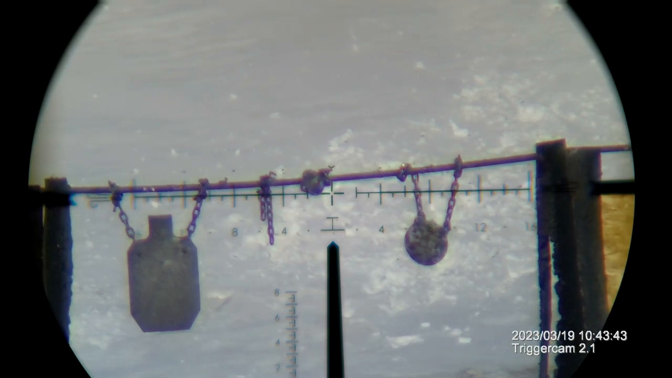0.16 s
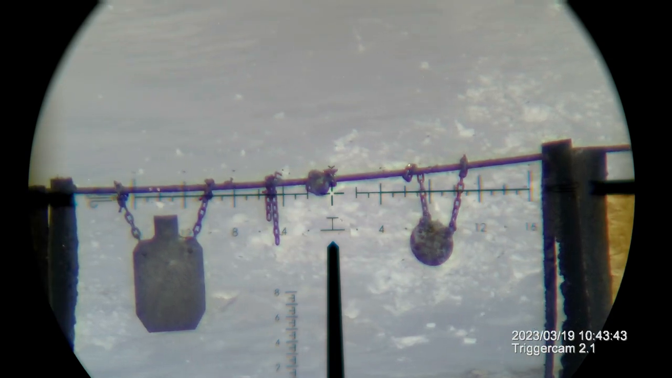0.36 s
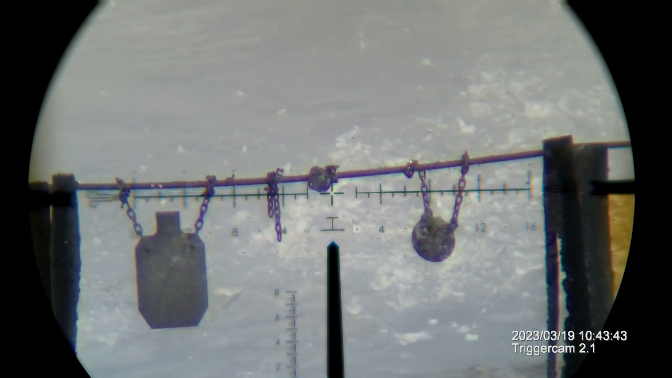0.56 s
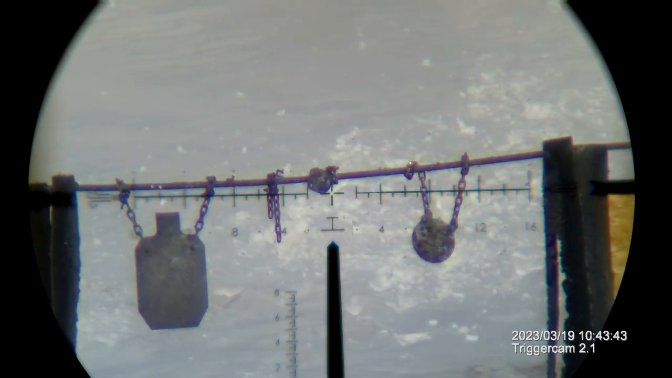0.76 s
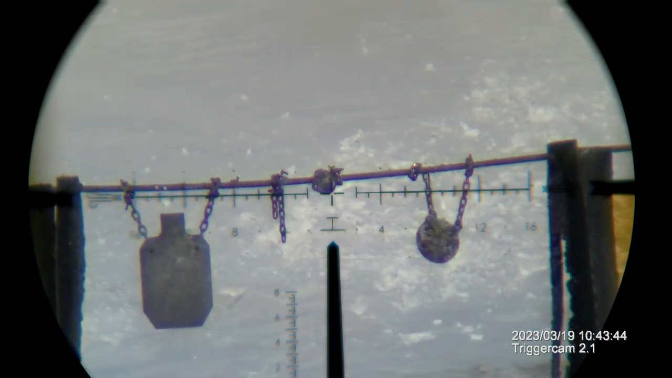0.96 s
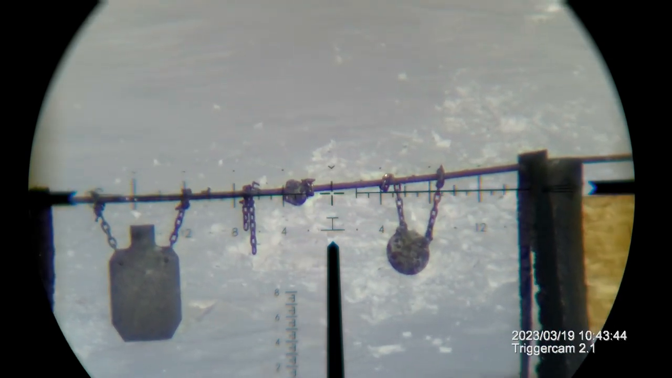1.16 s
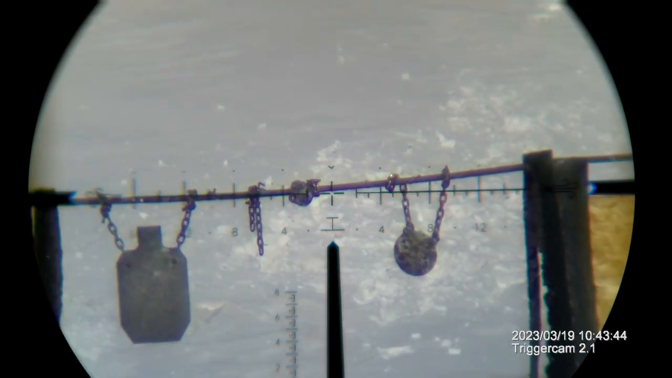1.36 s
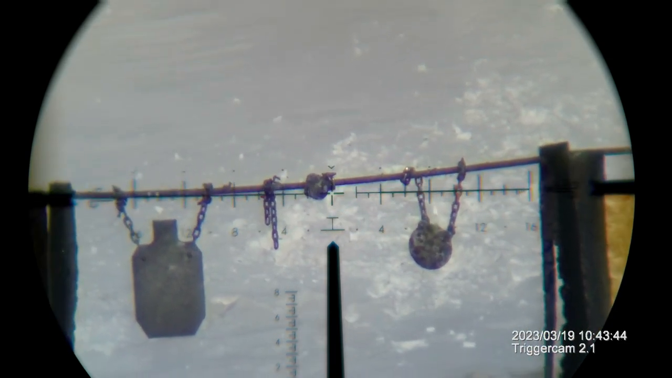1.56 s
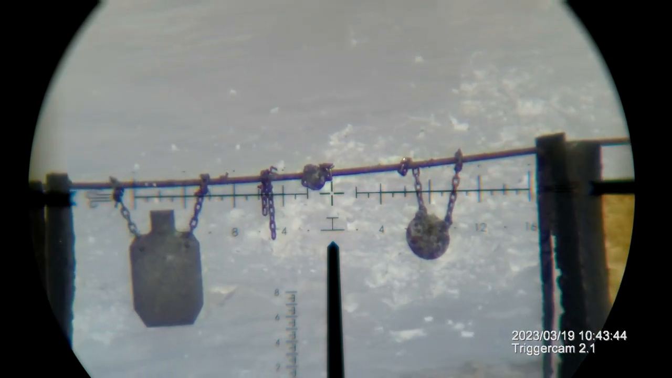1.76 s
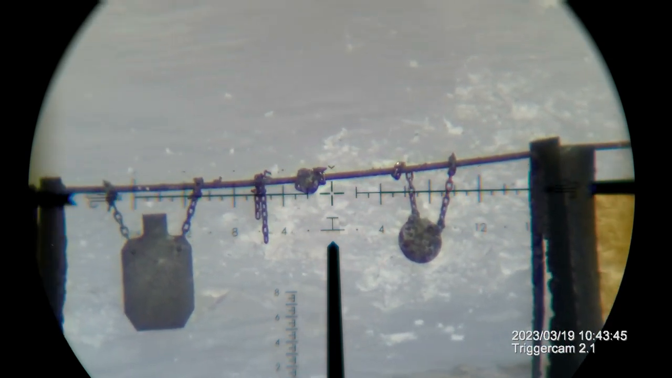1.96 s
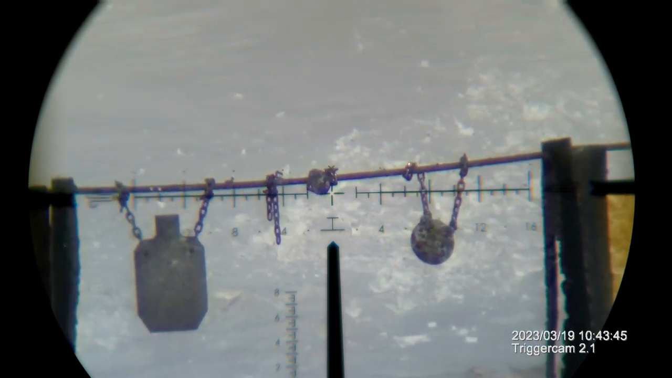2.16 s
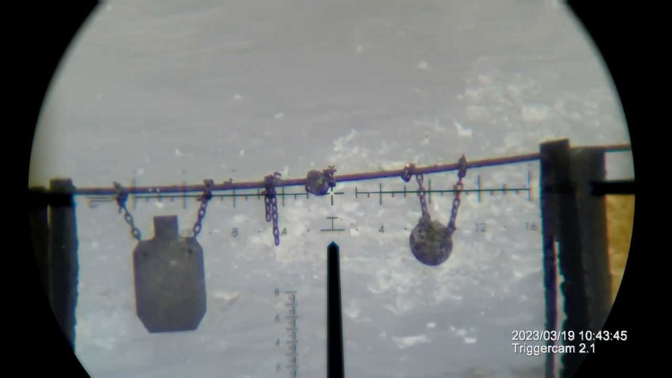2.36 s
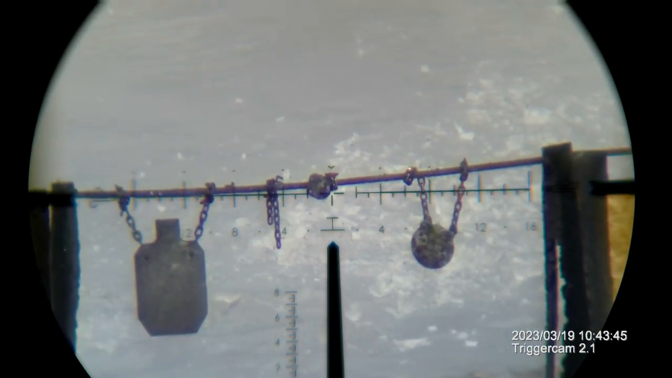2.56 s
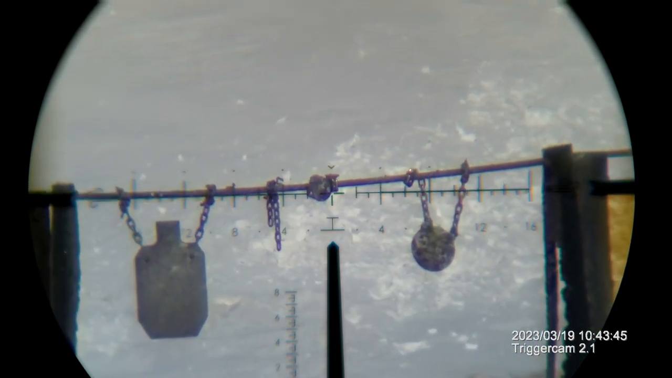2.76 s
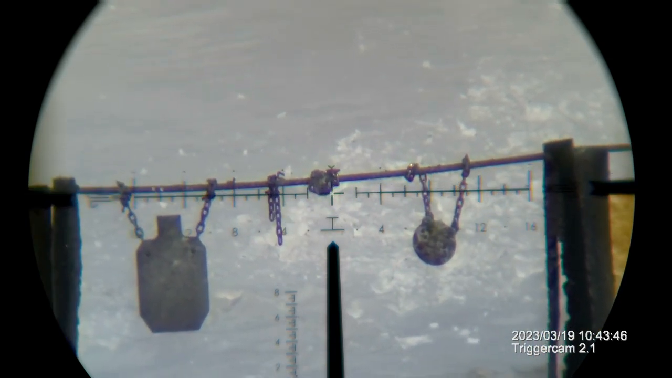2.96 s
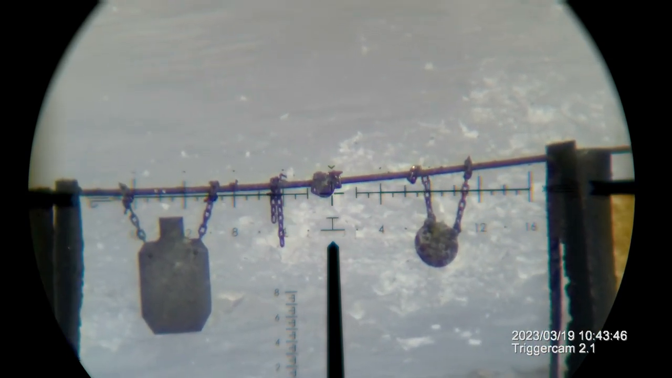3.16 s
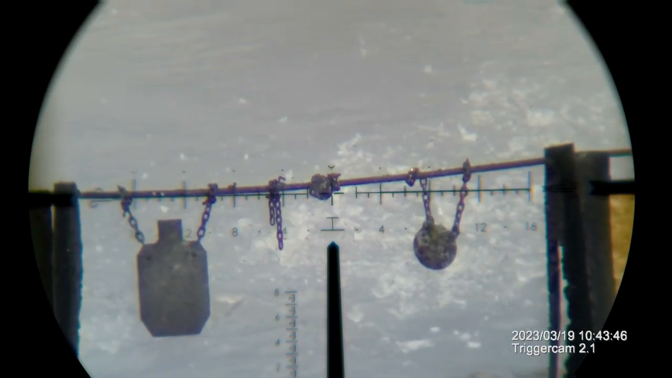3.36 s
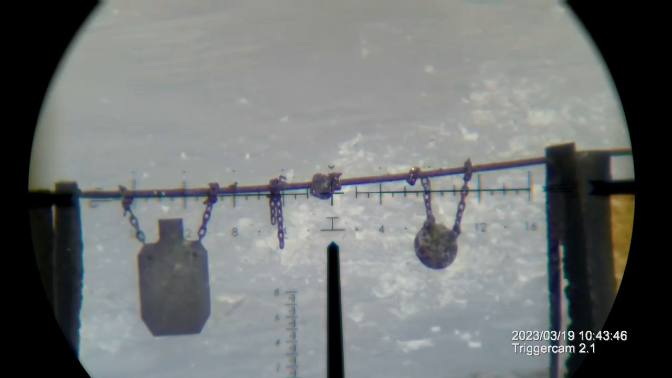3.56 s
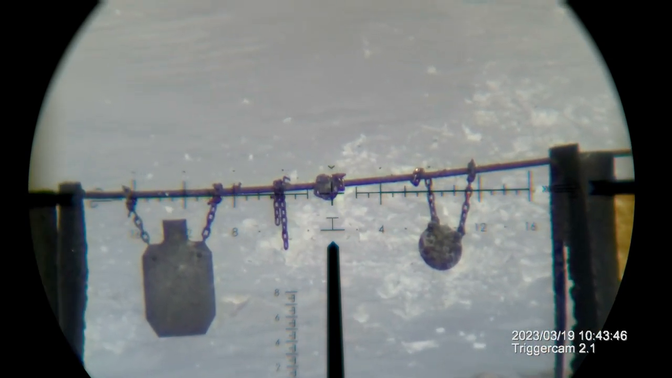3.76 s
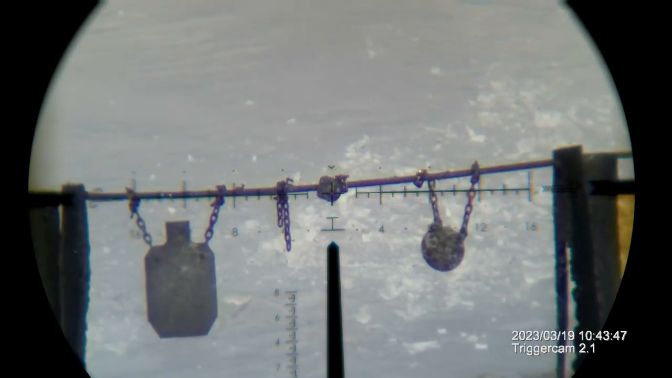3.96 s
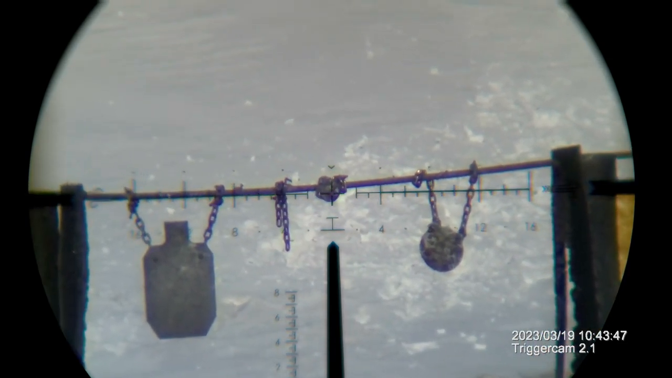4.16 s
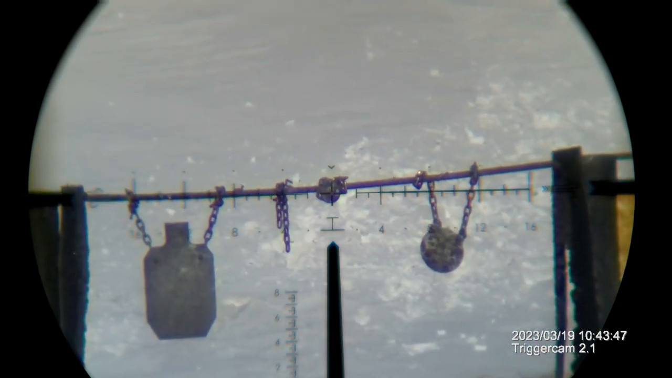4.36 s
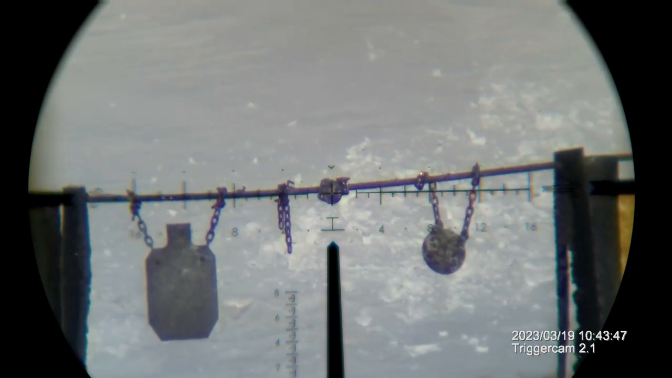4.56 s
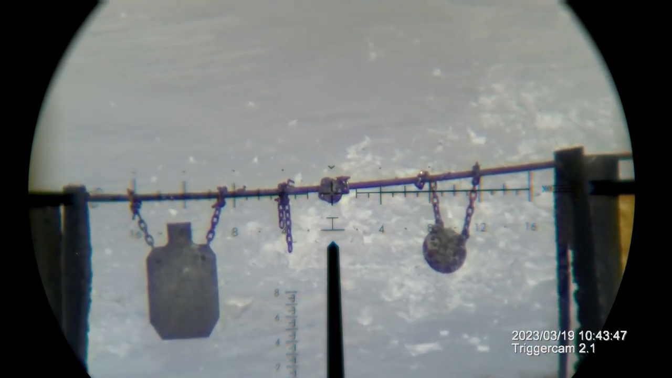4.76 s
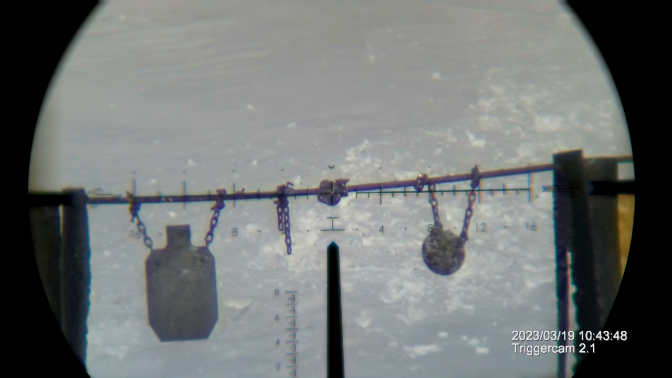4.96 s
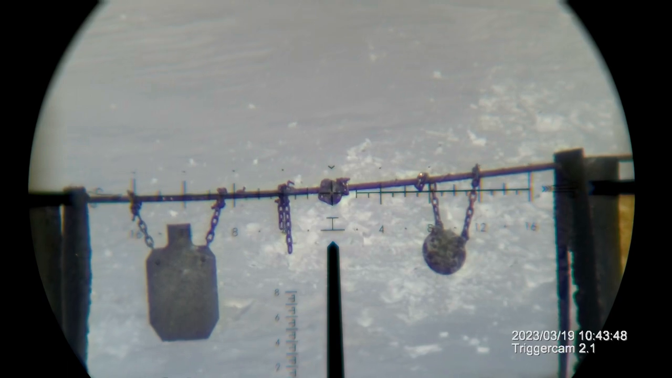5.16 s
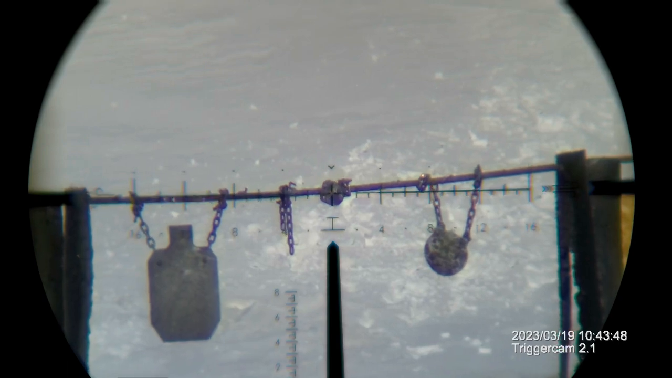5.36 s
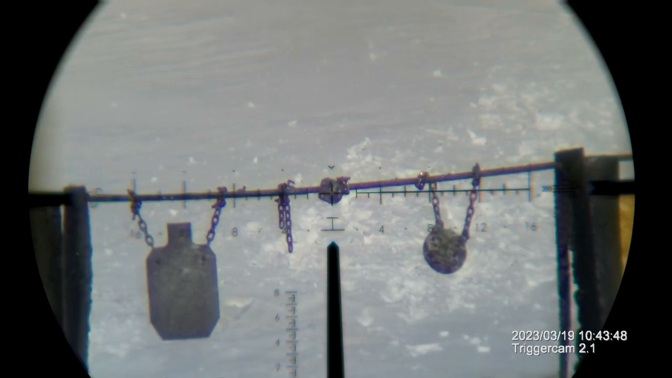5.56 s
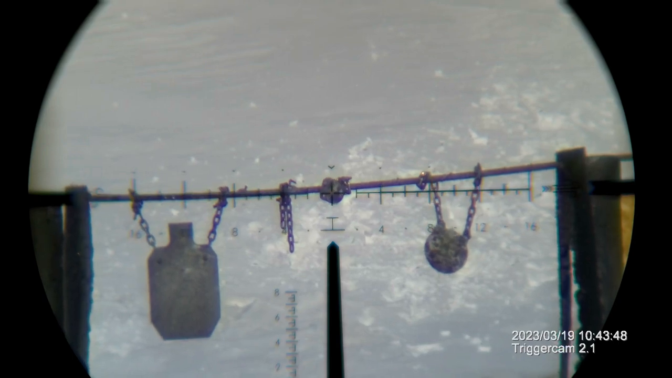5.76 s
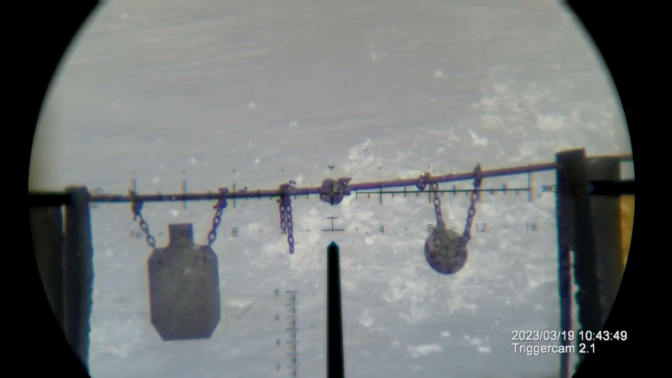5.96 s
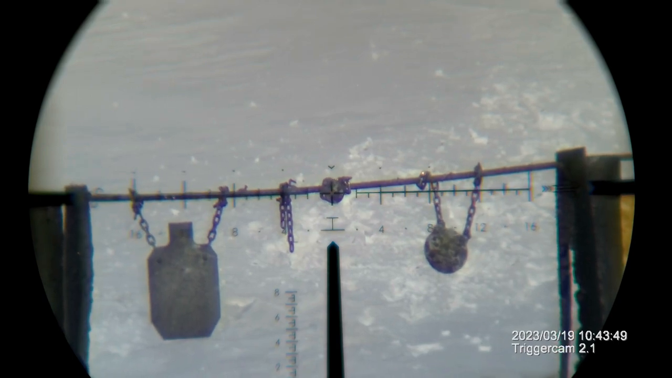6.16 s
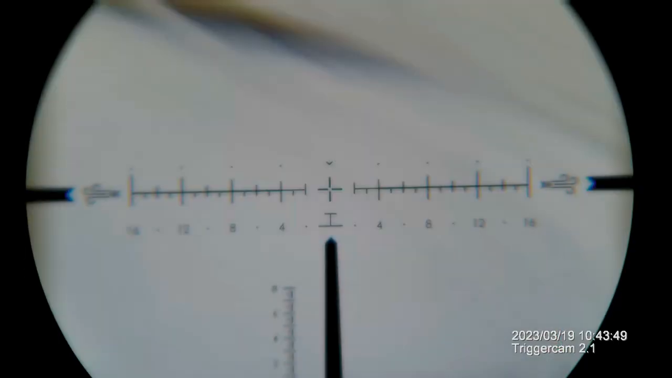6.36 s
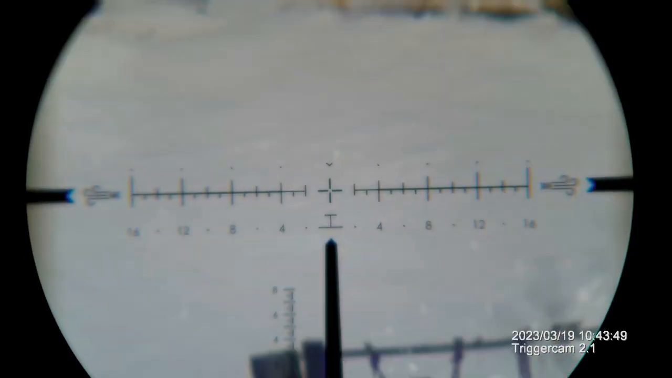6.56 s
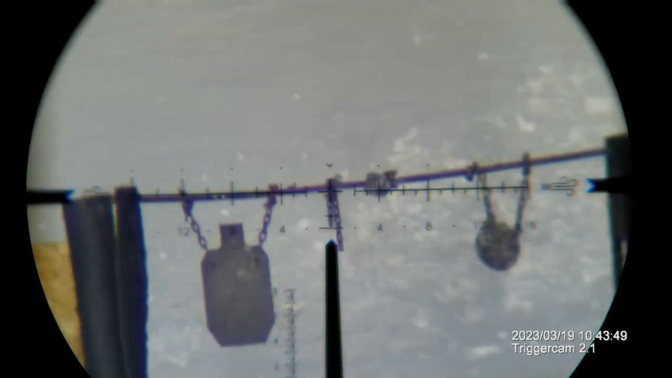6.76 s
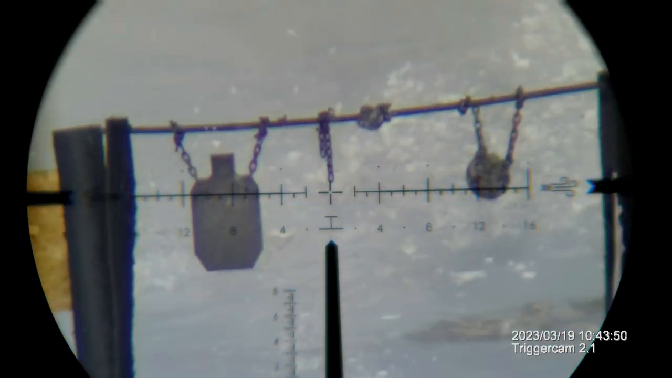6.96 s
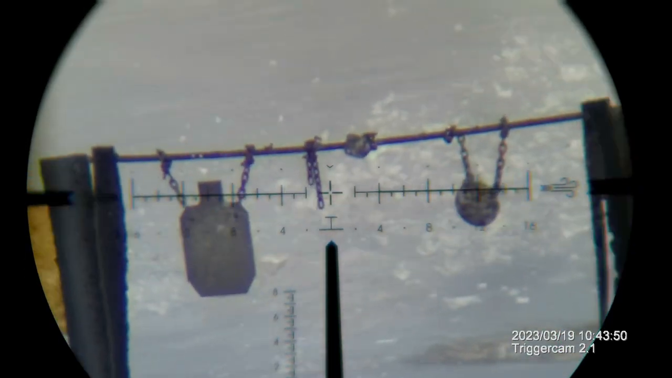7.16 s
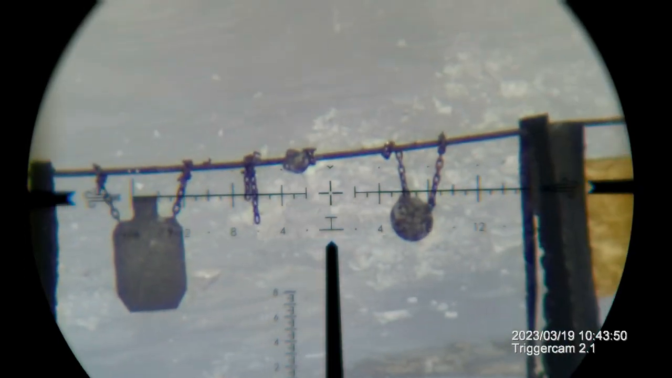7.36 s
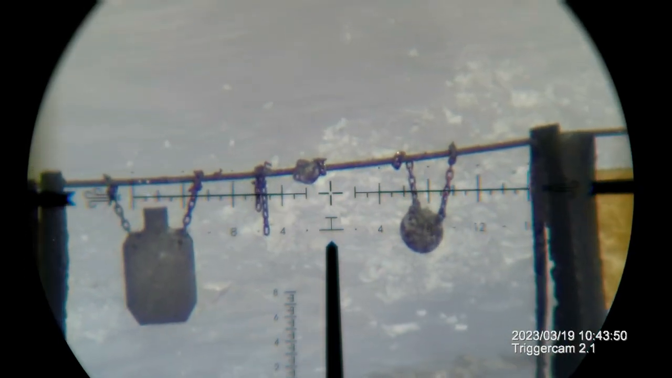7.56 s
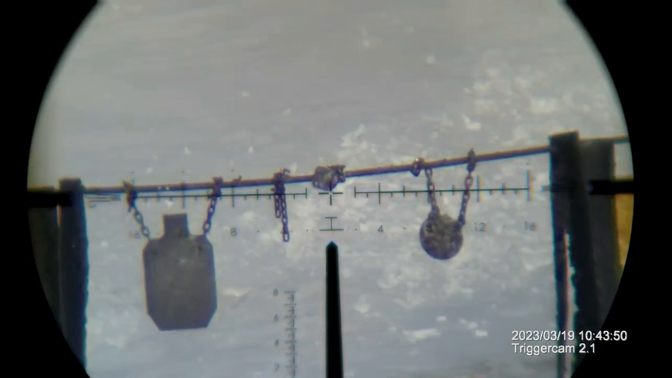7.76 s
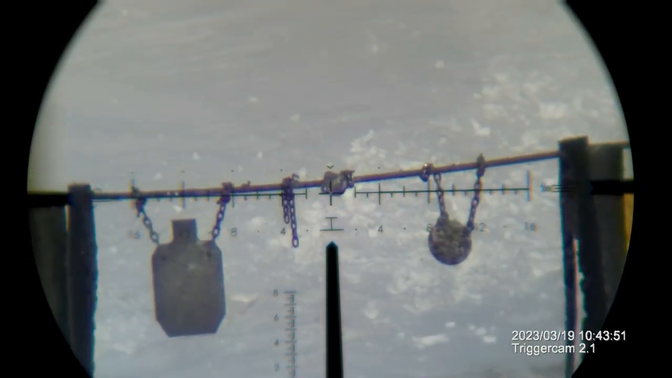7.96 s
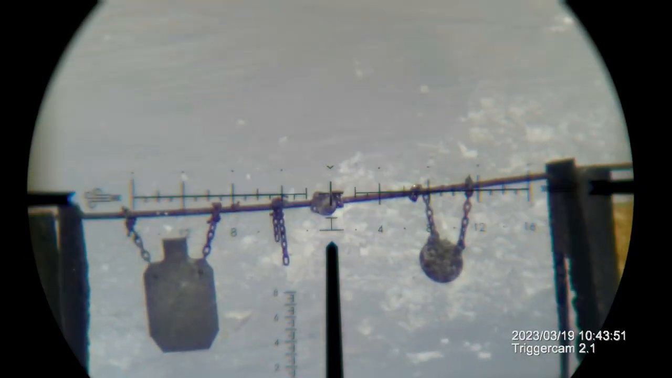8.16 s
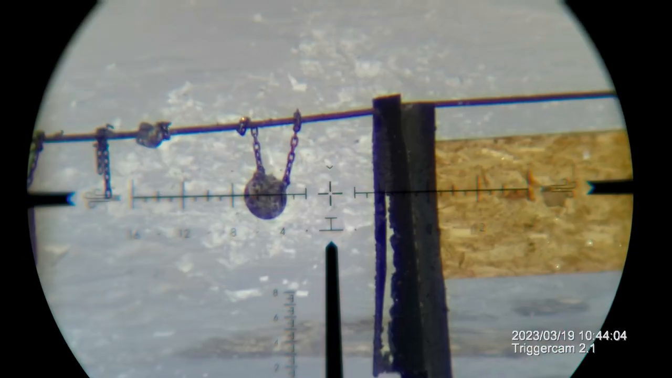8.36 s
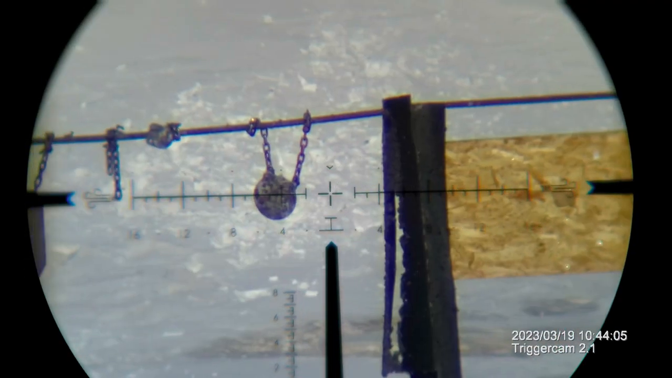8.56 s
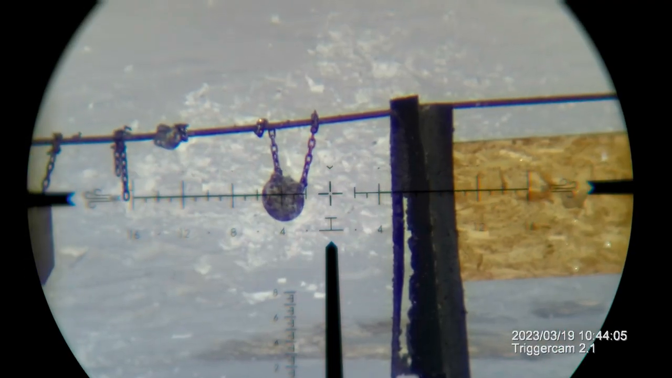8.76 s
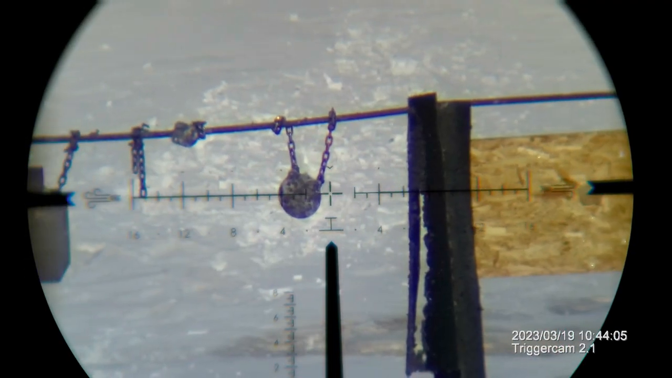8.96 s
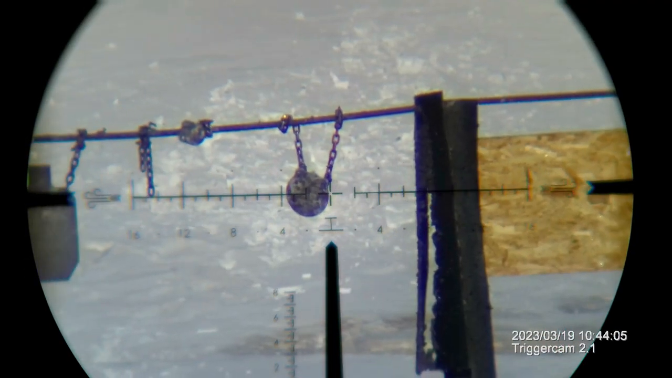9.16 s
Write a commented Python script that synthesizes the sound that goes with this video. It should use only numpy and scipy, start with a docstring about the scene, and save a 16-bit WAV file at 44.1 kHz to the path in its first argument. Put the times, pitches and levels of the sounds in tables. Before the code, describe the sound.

At an outdoor range, soft handling and a nearby gunshot precede a huge distorted rifle shot, sharp cracking echoes and long-ringing steel.

```python
"""A rifle fires on a range and overloads the small camera microphone on its scope, leaving steel ringing.
The blast is layered noise bursts; the steel and the sharp reports from downrange are decaying sines.
Before it the rifle clicks and rubs in the hands and a neighbour's blast wave arrives, with rolling echoes.
A low rumble, hiss and the camera's whine lie underneath; near the end all dips to silence and the ring stops."""
import sys
import numpy as np
from scipy import signal
from scipy.fft import rfft, irfft
from scipy.io import wavfile

SR = 44100
rng = np.random.default_rng(int(sys.argv[2]) if len(sys.argv) > 2 else 0)


def generate_wav(signal):
    """Clip the signal to [-1, 1] and save it as 16-bit WAV at the path in sys.argv[1]."""
    frames = np.transpose(np.atleast_2d(signal))
    scaled = np.clip(frames, -1, 1) * 32767
    pcm = np.round(scaled).astype(np.int16)
    wavfile.write(sys.argv[1], SR, pcm)


N = 406602
T = np.arange(N) / SR
FREQS = np.arange(N // 2 + 1) * SR / N
DIP_S = 8.266  # the steel stops here, at the bottom of a brief dip to silence


def amp(db):
    """Decibels to gain."""
    return 10 ** (np.asarray(db) / 20)


def unit(x):
    """Scales to an rms of 1."""
    return x / np.sqrt(np.mean(x ** 2) + 1e-20)


def add(mix, s, sound):
    """Mixes a sound in at a time in seconds, cut off at the end of the mix."""
    part = mix[round(s * SR):][:len(sound)]
    part += sound[:len(part)]


def noise(spectrum):
    """Steady noise of rms 1, coloured by a table of pitch_hz and level_db."""
    hz, db = np.transpose(spectrum)
    gain = amp(np.interp(np.log(FREQS + 1), np.log(hz), db))
    return unit(irfft(rfft(rng.standard_normal(N)) * gain, N))


def band(hz, centre_hz, octaves):
    """Gain of a broad hump with gentle skirts."""
    return (1 + (np.log2((hz + 1) / centre_hz) / octaves) ** 2 / 4) ** -3


def fade(t, t60):
    """Exponential decay, 60 dB down after t60 seconds."""
    return np.exp(-np.log(1000) * t / t60)


def burst(centre_hz, octaves, rise, t60):
    """A second of band noise that swells and dies away."""
    t = T[:SR]
    gain = band(np.arange(SR // 2 + 1), centre_hz, octaves)
    hiss = unit(irfft(rfft(rng.standard_normal(SR)) * gain, SR))
    return hiss * (1 - np.exp(-t / rise)) * fade(t, t60)


def ring(modes, t):
    """Struck modes, each a sine dying at its own speed."""
    return sum(amp(db) * np.sin(2 * np.pi * hz * t) * fade(t, t60) for hz, db, t60 in modes)


def smooth(x, hz, kind="low", order=2):
    """A causal low-pass or high-pass."""
    return signal.sosfilt(signal.butter(order, min(hz, .45 * SR), kind, fs=SR, output="sos"), x)


def swell(peak_s, db, rise, t60):
    """An envelope that grows smoothly to a peak and then dies away."""
    grown = np.clip(1 + (T - peak_s) / rise, 0, 1)
    return amp(db) * np.sin(np.pi / 2 * grown) ** 2 * fade(np.maximum(T - peak_s, 0), t60)


# colour of the rumble: pitch_hz, level_db (per Hz)
RUMBLE_COLOUR = [(15, -5), (28, -5), (42, -0.5), (55, -5), (72, -12), (95, -4.5), (115, -15.5), (170, -15),
                 (250, -23), (400, -34.5), (800, -61)]
# colour of the microphone hiss: pitch_hz, level_db (per Hz)
HISS_COLOUR = [(100, 0), (500, 2.5), (1000, -3), (2300, -4.5), (3500, -8.5), (6500, -10), (10000, -11),
               (12500, -8.5), (15000, -13.5)]
# strength of rumble and hum together: time_s, level_db
RUMBLE_STRENGTH = [(0, -39.5), (1.7, -36), (2.6, -38.5), (3.7, -36), (4.4, -40), (8.1, -41), (8.5, -44.5),
                   (9.22, -45)]
# the hum climbs and settles
HUM_START_HZ, HUM_HZ, HUM_SETTLE_S = 44.7, 51.7, 1.0


def background():
    """Low rumble around a hum that wavers in pitch and level, and even microphone hiss."""
    climb = HUM_HZ + (HUM_START_HZ - HUM_HZ) * np.exp(-T / HUM_SETTLE_S)
    hz = climb * (1 + 0.024 * noise([(1, 0), (5, 1), (15, -60.0)]))
    phase = 2 * np.pi * np.cumsum(hz) / SR
    waver = amp(1.5 * noise([(1, -2.0), (6, -5), (18, -61.5)]))
    hum = (np.sin(phase) + amp(-15.5) * np.sin(2 * phase)) * waver
    low = amp(-6.0) * noise(RUMBLE_COLOUR) + hum
    strength = amp(np.interp(T, *np.transpose(RUMBLE_STRENGTH)))
    return low * strength + amp(-61.0) * noise(HISS_COLOUR)


# whine of the camera's electronics, close to the microphone: pitch_hz, width_hz, level_db
WHINE_BANDS = [(7600, 620, -5), (8740, 370, -9), (9770, 370, 0.5), (10740, 241.2, -1.5)]


def camera_whine():
    """The electronics chirp for each picture and each sound block, on the ticks of a 10 ms clock."""
    jobs = np.concatenate([np.arange(0, T[-1], 1 / rate) for rate in (30, 23.44)])  # per second
    ticks = np.unique(np.ceil(jobs * 100 - .01) / 100)
    busy = np.zeros(N)
    for s in ticks:
        add(busy, s + 0.0072, signal.windows.tukey(round(0.006007 * SR), .4))
    colour = sum(amp(db) * np.exp(-2 * ((FREQS - hz) / width) ** 2 / np.e) for hz, width, db in WHINE_BANDS)
    return amp(-59.5) * busy * unit(irfft(rfft(rng.standard_normal(N)) * colour, N))


# modes of the stock, for rubbing and clicks: pitch_hz, level_db, t60_s (shorter under rubbing hands)
STOCK_MODES = [(313, -12, 0.092), (493, -5.5, 0.14), (570, -22.5, 0.1), (884.5, -16.5, 0.11),
               (1090, -20.5, 0.037), (1090, -13.5, 0.014), (1430, -15, 0.038), (1526, -16, 0.081)]
# soft rubbing strokes on the stock: middle_s, level_db, half_length_s
RUB_STROKES = [(1.435, -60, 0.21), (1.71, -61, 0.063), (1.94, -66.5, 0.11)]


def rubbing():
    """Dense tiny slips ring the modes of the stock, swelling and fading with each stroke."""
    slips = rng.standard_normal(N) ** 3 * (rng.random(N) < 2600 / SR)  # about 2600 a second
    body = ring([(hz, db, 0.46 * t60) for hz, db, t60 in STOCK_MODES], T[:SR // 8])
    pressure = sum(amp(db) * np.exp(-((T - s) / half) ** 2) for s, db, half in RUB_STROKES)
    ringing = unit(smooth(signal.oaconvolve(slips, body)[:N], 540, "high"))
    return pressure * (ringing + amp(-13) * unit(smooth(slips, 3200)))


# handling clicks on the rifle: start_s, level_db, pitch_hz, t60_s, tick_db (metal tick relative to the click)
HANDLING_CLICKS = [(0.8697, -29, 1150, 0.036, -31), (0.9034, -27, 1260, 0.031, -11),
                   (.9135, -38.5, 1182, 0.027, -4.5), (1.298, -55, 1130, 0.054, -16),
                   (1.421, -54, 600, .04, -22), (1.5228, -45, 1030, 0.02, -18),
                   (1.5478, -51.5, 830, 0.11, -22), (1.7226, -37.5, 1060, 0.042, -24),
                   (1.7256, -34.5, 510, 0.039, -28), (2.049, -57.5, 1000, .05, -20),
                   (7.181, -43, 228, 0.16, -35), (7.345, -43, 1370, .04, -8),
                   (8.176, -35, 1380, 0.019, -18), (8.181, -52.5, 1460, 0.21, -22)]
# shared by all clicks: scrape, metal tick, dull thud and ring of the stock
SCRAPE_OCTAVES, SCRAPE_RISE_S = 0.29, 0.00021
TICK_HZ, TICK_OCTAVES, TICK_T60_S = 3570, 0.2, 0.014
THUD_DB, THUD_HZ, THUD_OCTAVES, THUD_T60_S = -16.5, 347, 0.29, 0.14
STOCK_DB, STOCK_OCTAVES = 6, 0.76


def handling():
    """Each click scrapes, ticks and thuds, and rings the modes of the rifle that lie in its band."""
    out = np.zeros(N)
    for s, db, hz, t60, tick_db in HANDLING_CLICKS:
        modes = [(f, d + 20 * np.log10(band(f, hz, STOCK_OCTAVES)), life) for f, d, life in STOCK_MODES]
        scrape = burst(hz, SCRAPE_OCTAVES, SCRAPE_RISE_S, t60)
        tick = amp(tick_db) * burst(TICK_HZ, TICK_OCTAVES, SCRAPE_RISE_S, TICK_T60_S)
        thud = amp(THUD_DB) * burst(THUD_HZ, THUD_OCTAVES, SCRAPE_RISE_S, THUD_T60_S)
        add(out, s, amp(db) * (scrape + tick + thud + amp(STOCK_DB) * ring(modes, T[:SR])))
    return out


# neighbour's shot and its reflections: start_s, level_db (before the 3 dB gain below),
# push_s (length of the push), brightness_hz
NEIGHBOUR_WAVES = [(3.0261, -6, 0.0069, 820), (3.0272, -13.5, .003, 700), (3.0278, -5.5, 0.0033, 202),
                   (3.045, -19, 0.016, 150), (3.0506, -14, 0.011, 597)]
# the first wave cracks briefly; the last reflection scatters off the ground in a dull wash
FAR_CRACK_DB, FAR_CRACK_HZ, FAR_CRACK_T60_S = -47, 2080, 0.061
FAR_WASH_DB, FAR_WASH_HZ, FAR_WASH_T60_S, FAR_WASH_TOP_HZ = -44, 2220, 0.29, 2800


def neighbour(scatter_db=-23, scatter_hz=520, slap_db=-24, slap_hz=850,
              thud_db=-22, thud_hz=270, tail_db=-36, tail_hz=450):
    """Blast waves push, then suck for longer; the first cracks and scatters, the last slaps and washes."""
    out, t = np.zeros(N), T[:SR]
    for s, db, push, bright_hz in NEIGHBOUR_WAVES:
        add(out, s, amp(db) * smooth((1 - t / push) * np.exp(-t / push), bright_hz, order=3))
    out = amp(3.0) * smooth(out, 17.0, "high")
    first_s, first_db = NEIGHBOUR_WAVES[0][:2]
    add(out, first_s, amp(first_db + scatter_db) * burst(scatter_hz, .62, .00046, 0.093))
    add(out, first_s, amp(FAR_CRACK_DB) * burst(FAR_CRACK_HZ, .45, .0003, FAR_CRACK_T60_S))
    slap = amp(slap_db) * burst(slap_hz, 0.82, 0.00022, 0.01)
    thud = amp(thud_db) * burst(thud_hz, 0.12, 0.00088, 0.083)
    wash = amp(FAR_WASH_DB) * smooth(burst(FAR_WASH_HZ, 0.37, 0.0026, FAR_WASH_T60_S), FAR_WASH_TOP_HZ, order=6)
    tail = amp(tail_db) * burst(tail_hz, 1.0, 0.0036, .25)
    add(out, NEIGHBOUR_WAVES[-1][0], slap + thud + wash + tail)
    return out


# colours of the low and bright echoes of the range: pitch_hz, level_db (per Hz)
LOW_COLOUR = [(20, -10), (60, 8.5), (110, -2), (200, 0), (330, -5.5), (450, -16), (650, -11), (1000, -26.5),
              (2000, -70.5)]
BRIGHT_COLOUR = [(300, -3.5), (750, 4.5), (1050, -1.5), (1350, 8), (1750, -0.5), (2000, 1), (2400, 7),
                 (3000, -7.5), (4300, -7), (5500, -18), (7500, -18), (10000, -30), (15000, -49)]
# low echoes rolling over the range after both shots: peak_s, level_db, rise_s, t60_s
LOW_WAVES = [(3.065, -33, .012, 0.27), (3.33, -53.5, 0.21, 4.2), (6.335, -6, 0.09, 0.21),
             (6.545, -28.5, 0.22, 2.26)]
# bright scatter from the ground and banks: peak_s, level_db, rise_s, t60_s
BRIGHT_WAVES = [(3.281, -55, .003, 0.053), (6.33, -33, .08, 1.12), (6.665, -43, .04, 0.35)]
# a distant bank hums the neighbour's shot back
BANK_S, BANK_DB, BANK_HZ = 3.44, -51.5, 680


def range_echo():
    """The shots roll over the range in low and bright waves of noise."""
    lumps = amp(2.1 * noise([(10, -6.0), (150, 0.0), (500, -51.5)]))  # single reflections stand out
    out = sum(swell(*wave) for wave in LOW_WAVES) * noise(LOW_COLOUR)
    out += lumps * sum(swell(*wave) for wave in BRIGHT_WAVES) * noise(BRIGHT_COLOUR)
    add(out, BANK_S, amp(BANK_DB) * burst(BANK_HZ, 0.19, .02, 0.52))
    return out


# sharp reports from downrange: start_s, level_db, pitch_hz, scatter_db (relative to the snap)
DOWNRANGE_REPORTS = [(6.449, -27.5, 3000, -8.5), (6.456, -22, 4400, -27), (6.5031, 0, 335, -41),
                     (6.503, -7, 2470, -16.5), (6.6313, -17, 1310, -16), (6.701, -25, 2910, -14),
                     (6.804, -5, 2200, -19), (7.019, -2, 1027, -17), (7.0216, -2, 1790, -22),
                     (7.1262, -31, 1590, -20)]
# shared by all reports: cycles until the snap has died, bright edge, near scatter and late tail
SNAP_CYCLES, EDGE_DB, EDGE_HZ, EDGE_T60_S = 4.1, -27, 3880, 0.014
SCATTER_OCTAVES, SCATTER_T60_S, TAIL_DB, TAIL_HZ, TAIL_T60_S = 0.63, 0.026, -11, 1580, .18


def reports():
    """Impacts and echoes: a snap of a few cycles with a bright edge, then its scatter from the ground."""
    out, t = np.zeros(N), T[:SR]
    for s, db, hz, scatter_db in DOWNRANGE_REPORTS:
        snap = smooth(ring([(hz, 0, SNAP_CYCLES / hz)], t), 1.4 * hz)
        edge = ring([(EDGE_HZ, EDGE_DB, EDGE_T60_S)], t)
        tail_hz = np.sqrt(hz * TAIL_HZ)  # the tail keeps some of the snap's pitch
        near = burst(hz, SCATTER_OCTAVES, 0.00033, SCATTER_T60_S)
        tail = amp(TAIL_DB) * burst(tail_hz, 0.56, 0.0031, TAIL_T60_S)
        add(out, s, amp(db) * (snap + edge + amp(scatter_db) * (near + tail)))
    return out


# resonances of the camera's housing around the microphone: pitch_hz, width_hz, level_db
HOUSING_MODES = [(600, 93, 3.5), (1340, 150, -5), (2270, 240, -1.5), (3500, 170, -8), (5130, 180, -6)]


def housing(x):
    """Adds the short resonances of the camera's housing to a sharp sound."""
    return x + sum(amp(db) * signal.lfilter(*signal.iirpeak(hz, hz / width, fs=SR), x)
                   for hz, width, db in HOUSING_MODES)


# the recoil jolts the rifle on its rest: peak_s, level_db, rise_s, t60_s
RECOIL_JOLTS = [(6.362, -4, 0.11, 0.17), (6.453, -15, 0.013, .5)]
SHUDDER_FROM_S, SHUDDER_START_HZ, SHUDDER_HZ, SHUDDER_SETTLE_S = 6.338, 148, 201.4, 0.0358


def shudder():
    """The rifle shudders with the jolts, at a pitch that rises once as it settles on its rest."""
    settling = np.exp(-np.maximum(T - SHUDDER_FROM_S, 0) / SHUDDER_SETTLE_S)
    hz = SHUDDER_HZ + (SHUDDER_START_HZ - SHUDDER_HZ) * settling
    return sum(swell(*jolt) for jolt in RECOIL_JOLTS) * np.sin(2 * np.pi * np.cumsum(hz) / SR)


# the ringing steel: pitch_hz, level_db, t60_s
STEEL_MODES = [(456.6, -16.5, 6), (885, -31, 2.6), (914, -22, 2.82), (1235, -29.5, 2.3), (1441, -47, 1.8),
               (2019, -52.5, 2.9), (4205, -42, 0.78), (4974, -43, 0.67)]


def steel(start=6.23, recovery=.33, held_down_db=19):
    """The ring starts with the shot, is held down while the recorder's gain recovers, then fades slowly."""
    out, t = np.zeros(N), T[:3 * SR]
    held_down = amp(-held_down_db * np.maximum(1 - t / recovery, 0))
    add(out, start, ring(STEEL_MODES, t) * held_down)
    return out * (T < DIP_S)


# the muzzle blast: a bright crack, a roar, a boom and a dull rumble of the rifle and its rest
SHOT_S = 6.229
CRACK_DB, CRACK_HZ, CRACK_OCTAVES, CRACK_RISE_S, CRACK_T60_S = 24.5, 2700, 0.86, .012, .059
ROAR_DB, ROAR_HZ, ROAR_OCTAVES, ROAR_RISE_S, ROAR_T60_S = 23.5, 727, 0.98, 0.013, .061
BOOM_DB, BOOM_HZ, BOOM_DELAY_S, BOOM_T60_S = 23.5, 112, .0095, 0.093
BODY_DB, BODY_HZ, BODY_OCTAVES, BODY_DELAY_S, BODY_T60_S = 16, 283.8, 0.34, .023, .16
# the blast washes back from the bench and the ground
WASH_DB, WASH_HZ, WASH_OCTAVES, WASH_DELAY_S, WASH_T60_S = 4, 1080, 1.26, .021, .18
# the action chatters, each bounce weaker than the last, with a clang in it
CHATTER_S, BOUNCE_GAP_S, CHATTER_DB, BOUNCE_LOSS_DB = 6.2598, .0139, 0, 2
CHATTER_HZ, CHATTER_OCTAVES, BOUNCE_T60_S = 2470, 0.92, .025
CLANG_DB, CLANG_OCTAVES, CLANG_T60_S = -2.5, .2, 0.027


def shot():
    """Muzzle blast and its wash as noise bursts, then the bouncing chatter of the action."""
    out = np.zeros(N)
    add(out, SHOT_S, amp(CRACK_DB) * burst(CRACK_HZ, CRACK_OCTAVES, CRACK_RISE_S, CRACK_T60_S))
    add(out, SHOT_S, amp(ROAR_DB) * burst(ROAR_HZ, ROAR_OCTAVES, ROAR_RISE_S, ROAR_T60_S))
    add(out, SHOT_S + BOOM_DELAY_S, amp(BOOM_DB) * burst(BOOM_HZ, 0.4, 0.0015, BOOM_T60_S))
    add(out, SHOT_S + BODY_DELAY_S, amp(BODY_DB) * burst(BODY_HZ, BODY_OCTAVES, 0.0029, BODY_T60_S))
    add(out, SHOT_S + WASH_DELAY_S, amp(WASH_DB) * burst(WASH_HZ, WASH_OCTAVES, .005, WASH_T60_S))
    for k in range(6):
        clack = burst(CHATTER_HZ, CHATTER_OCTAVES, .0006, BOUNCE_T60_S)
        clang = amp(CLANG_DB) * burst(CHATTER_HZ, CLANG_OCTAVES, 0.00052, CLANG_T60_S)
        add(out, CHATTER_S + k * BOUNCE_GAP_S, amp(CHATTER_DB - k * BOUNCE_LOSS_DB) * (clack + clang))
    return out


def scene():
    """Everything at the one microphone on the scope."""
    sharp = housing(handling() + neighbour() + reports())
    soft = background() + camera_whine() + rubbing()
    return (soft + sharp + shot() + shudder() + range_echo() + steel())[None]


CUTOFF_HZ = 15400


def record(dry, knee_db=-5, recovery_db=22, attack=0.033):
    """The input overloads flat, a slow limiter turns it down, the level dips, then the band is limited."""
    clipped = np.clip(dry[0], -1, 1)
    r = np.exp(-1 / (attack * SR))
    power_db = 10 * np.log10(signal.lfilter([1 - r], [1, -r], clipped ** 2) + 1e-12)
    # the held level falls by recovery_db each second
    held_db = np.maximum.accumulate(power_db + recovery_db * T) - recovery_db * T
    over_db = np.maximum(held_db - knee_db, 0)
    dip = np.minimum(abs(T - DIP_S) / 0.026, 1)
    out = smooth(clipped * amp(-over_db) * dip, 16500, order=1)
    band_limit = signal.firwin(401, CUTOFF_HZ, window=("kaiser", 8), fs=SR)
    return signal.oaconvolve(out, band_limit, "same")[None]


dry = scene()
out = record(dry)
generate_wav(out)
```